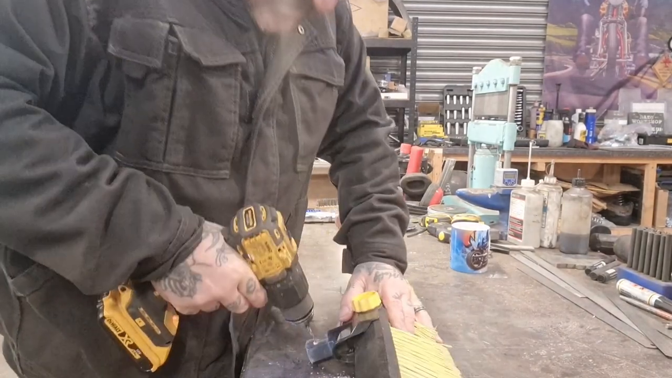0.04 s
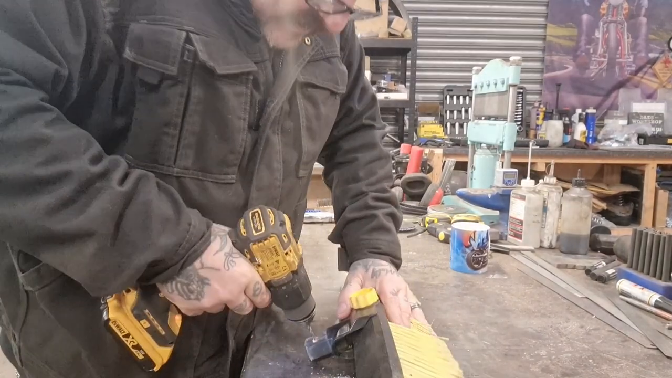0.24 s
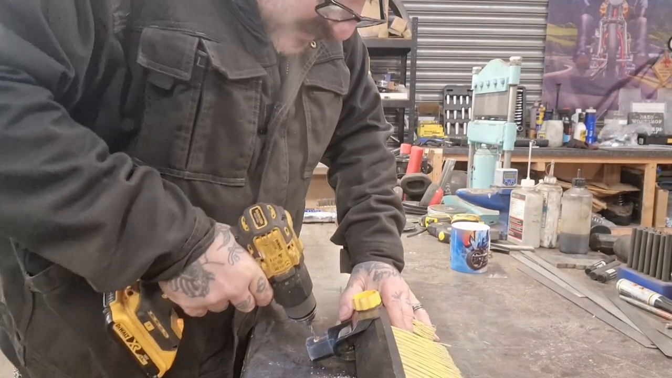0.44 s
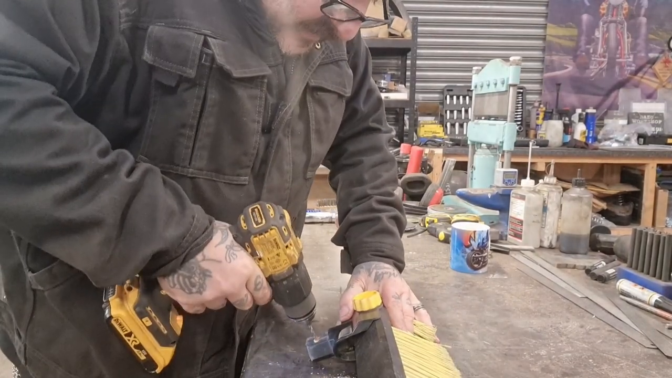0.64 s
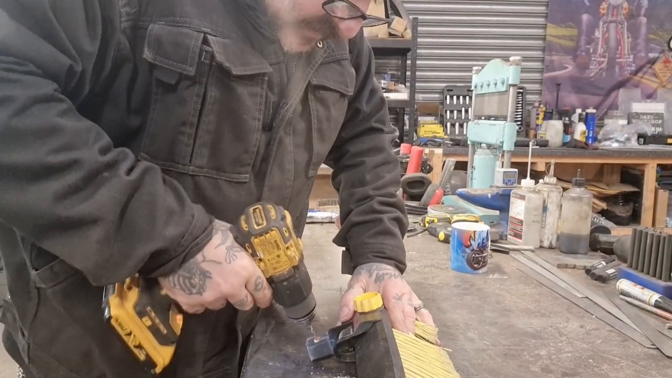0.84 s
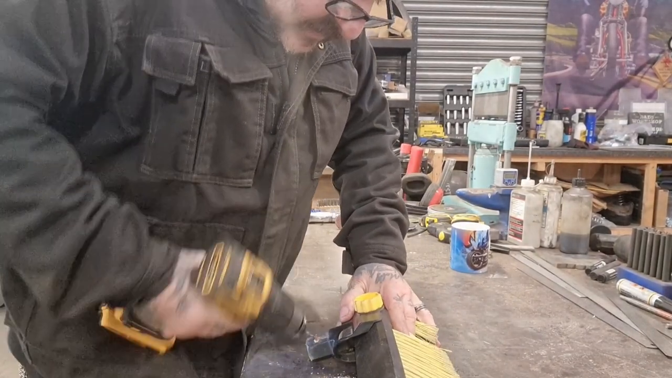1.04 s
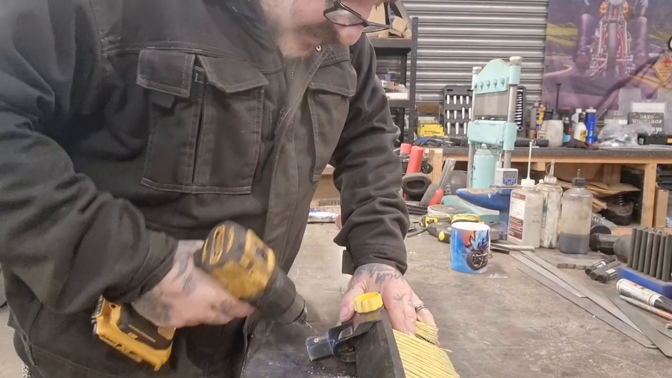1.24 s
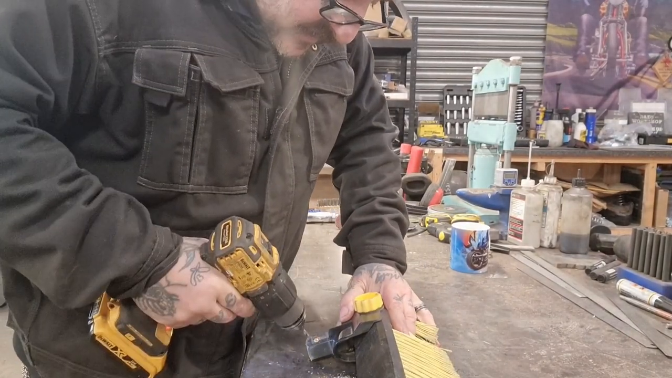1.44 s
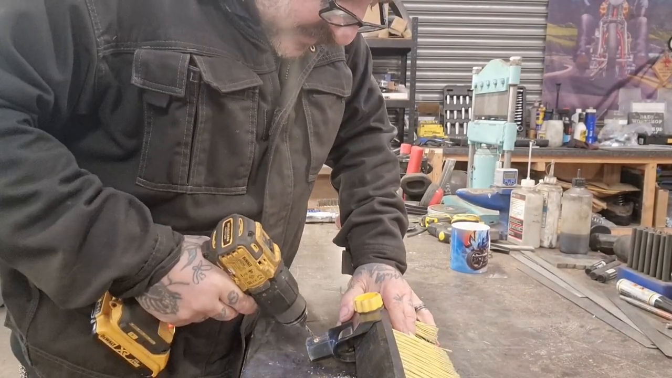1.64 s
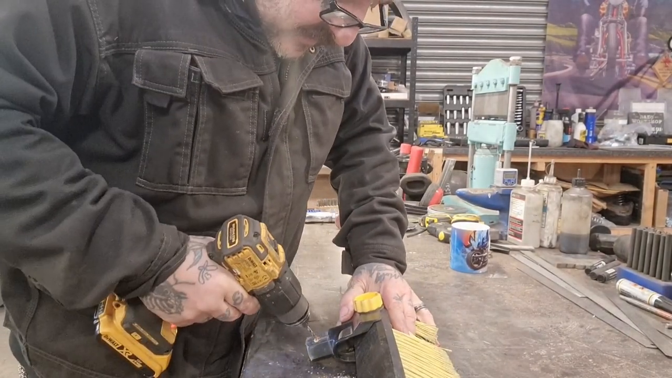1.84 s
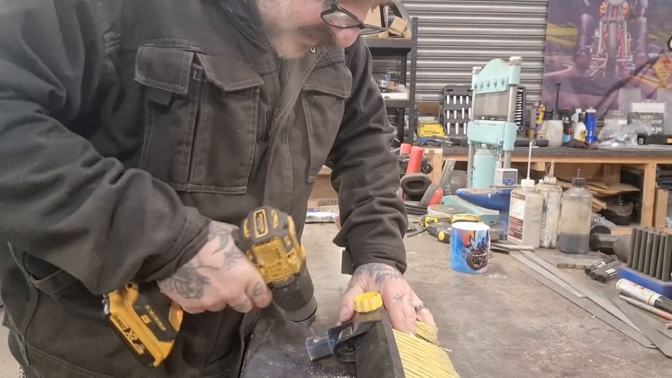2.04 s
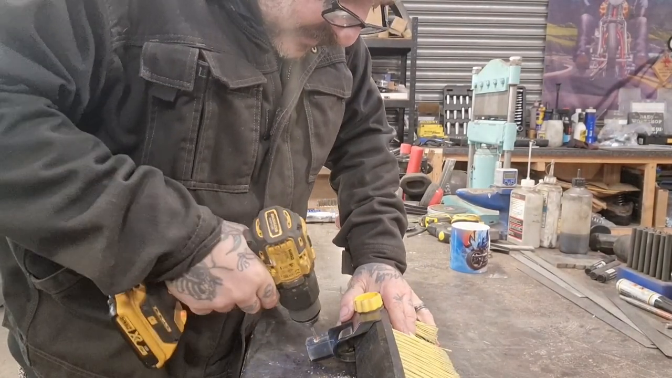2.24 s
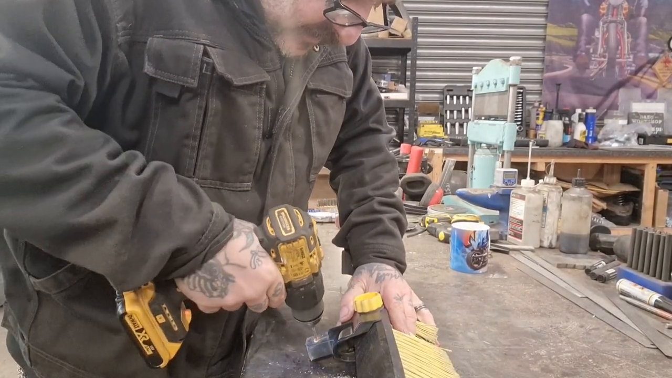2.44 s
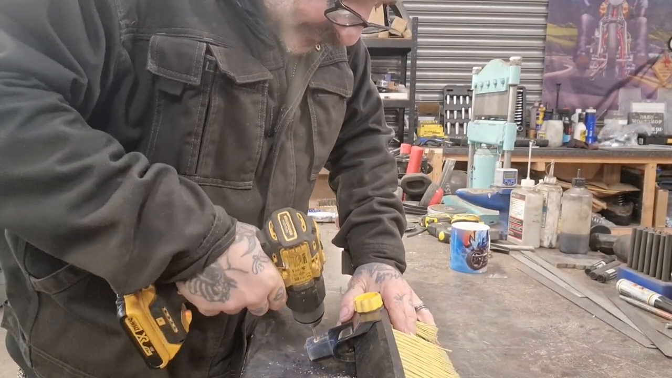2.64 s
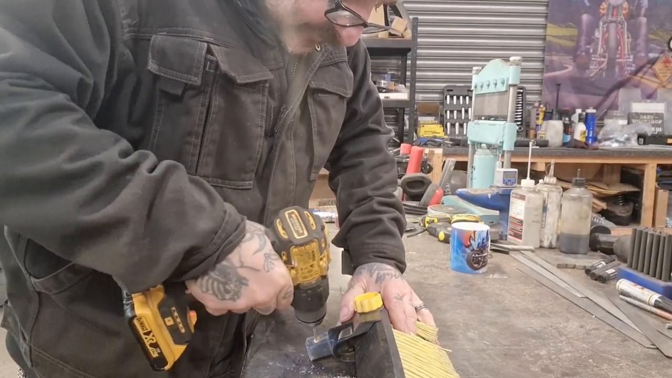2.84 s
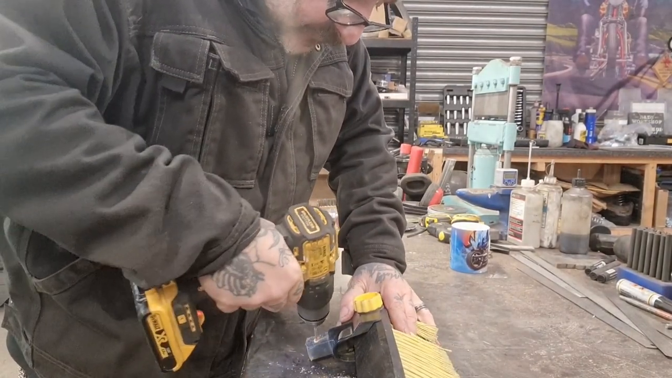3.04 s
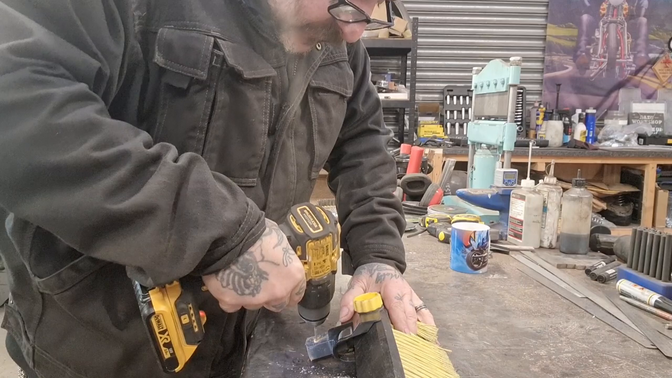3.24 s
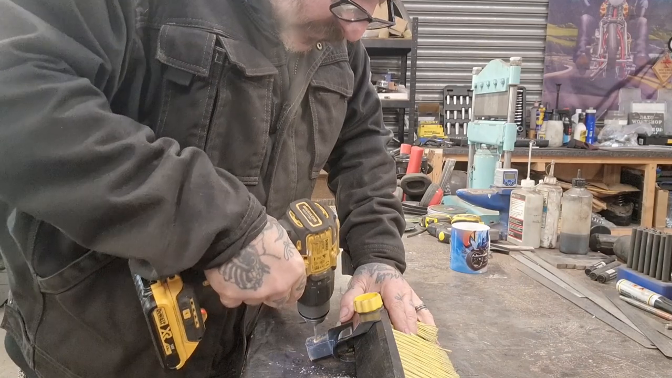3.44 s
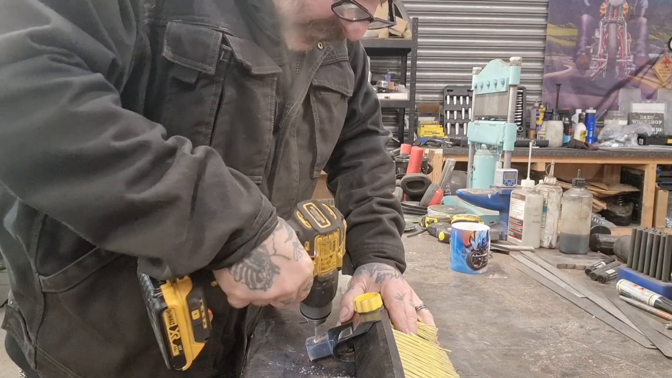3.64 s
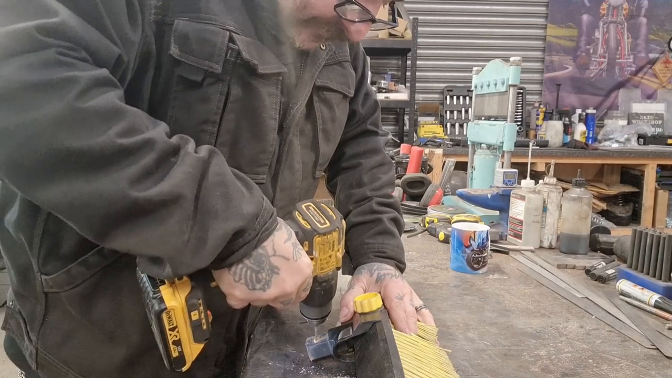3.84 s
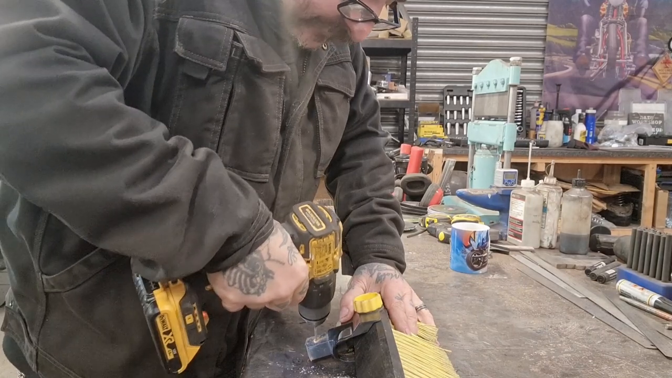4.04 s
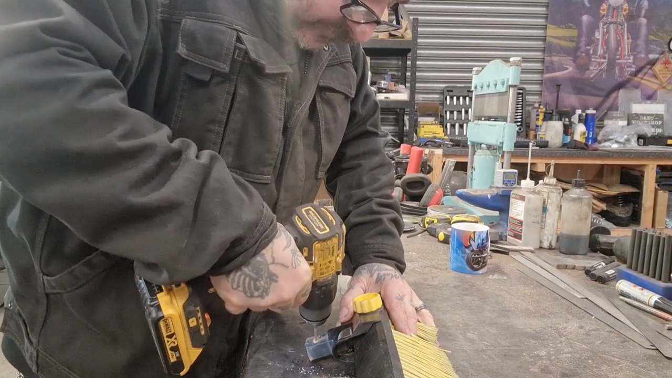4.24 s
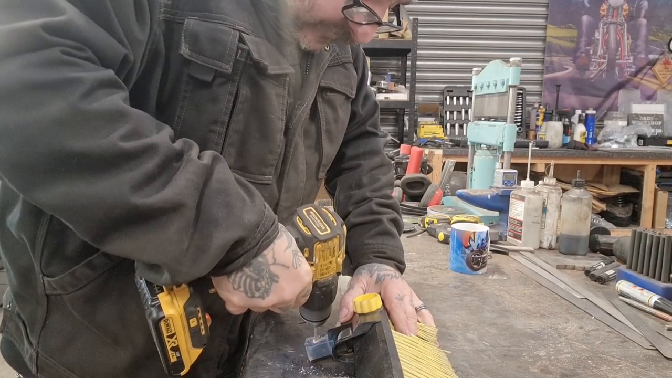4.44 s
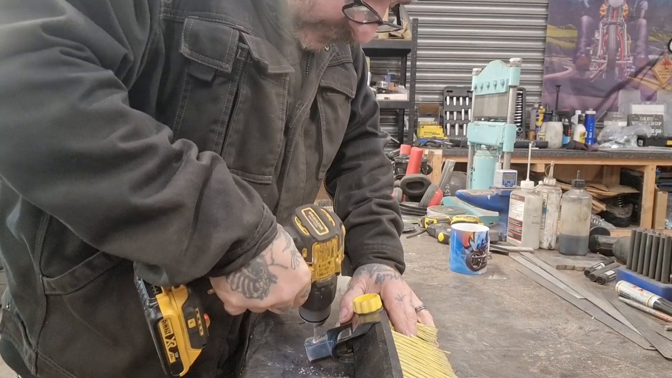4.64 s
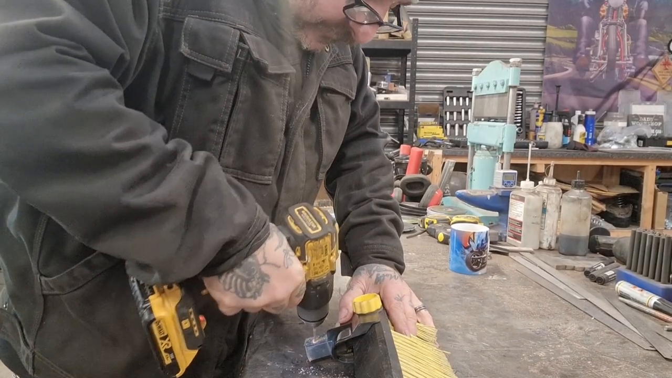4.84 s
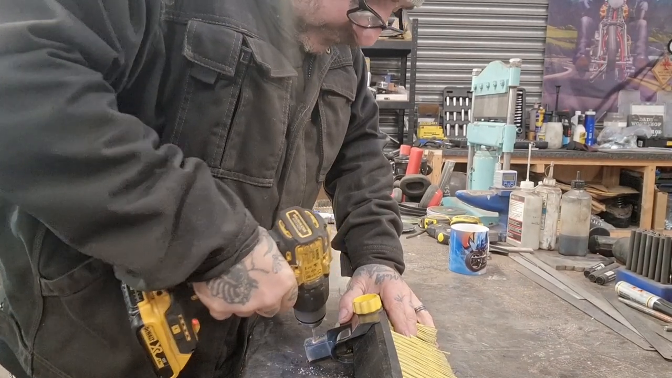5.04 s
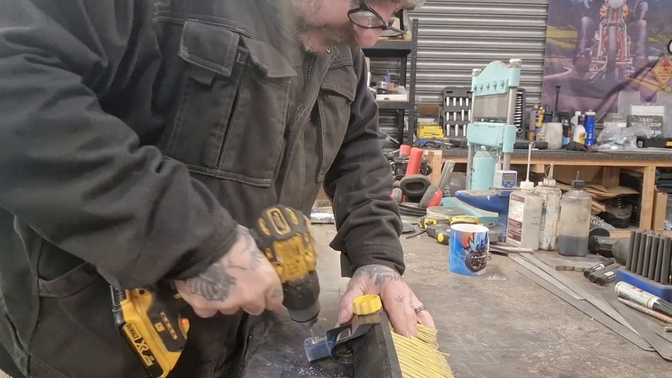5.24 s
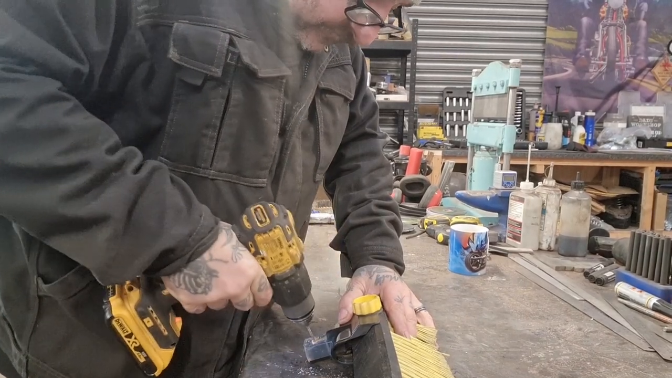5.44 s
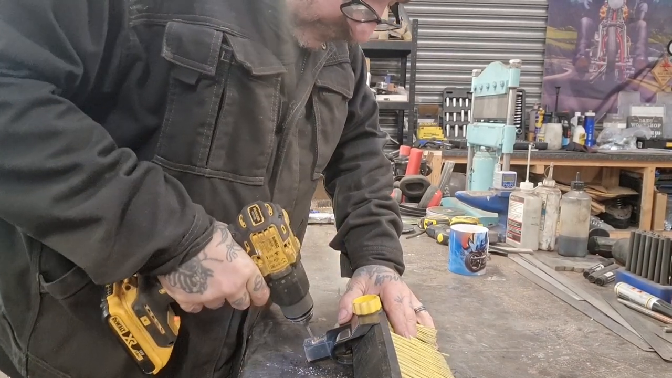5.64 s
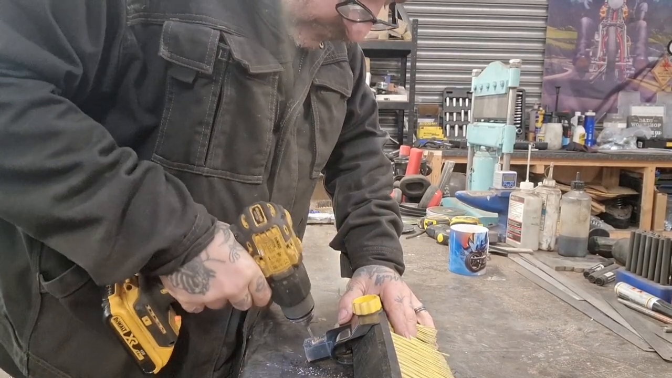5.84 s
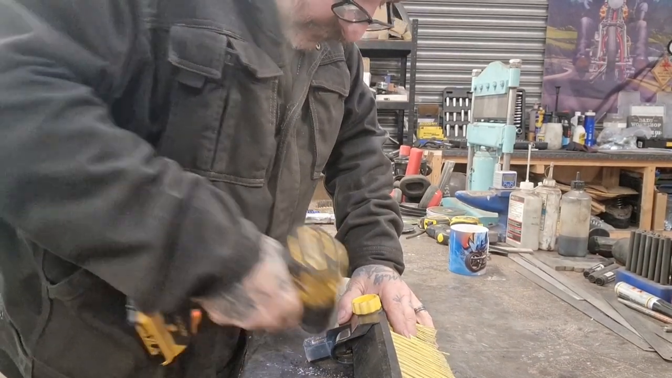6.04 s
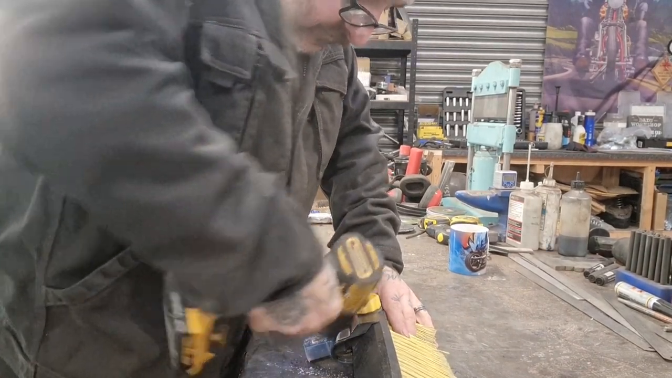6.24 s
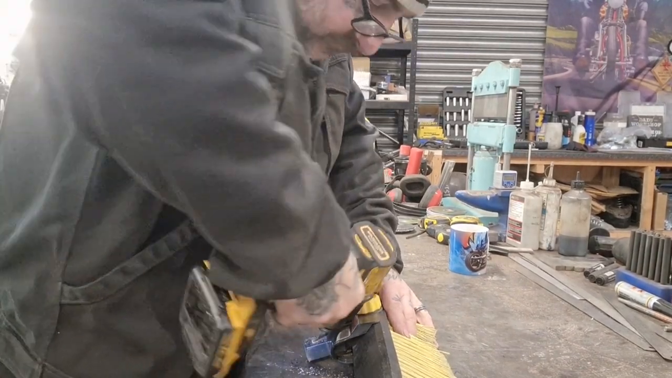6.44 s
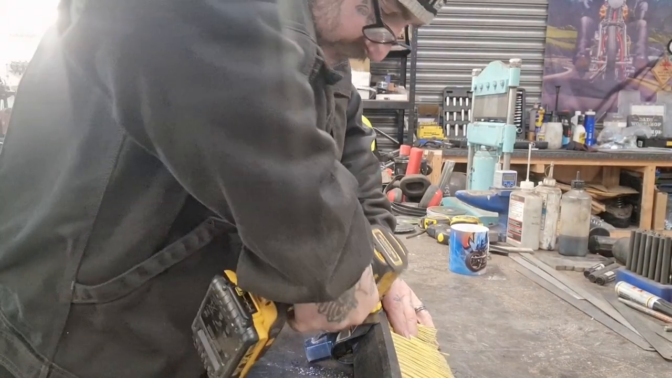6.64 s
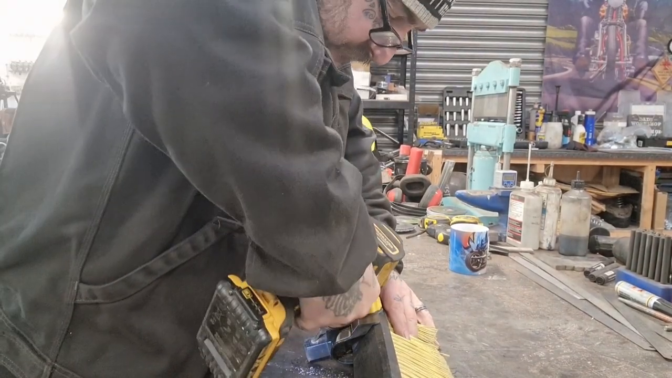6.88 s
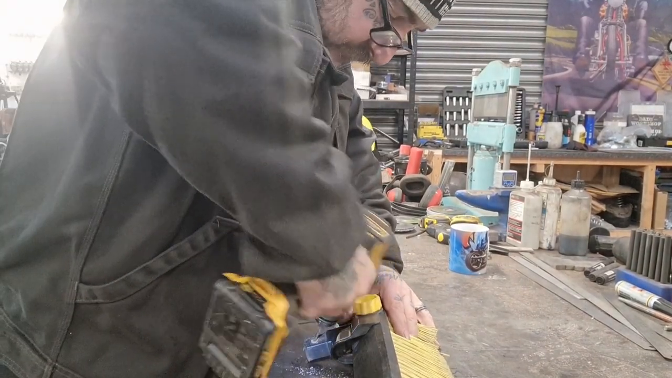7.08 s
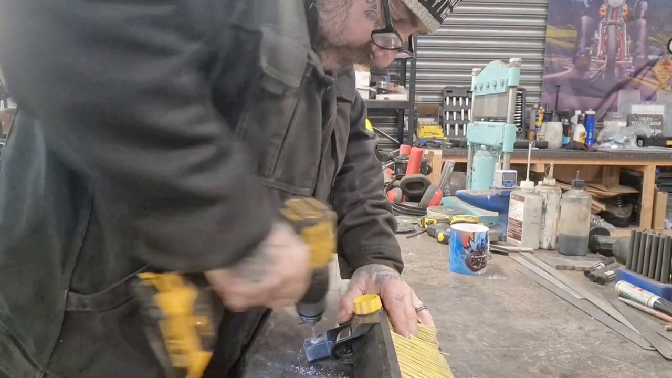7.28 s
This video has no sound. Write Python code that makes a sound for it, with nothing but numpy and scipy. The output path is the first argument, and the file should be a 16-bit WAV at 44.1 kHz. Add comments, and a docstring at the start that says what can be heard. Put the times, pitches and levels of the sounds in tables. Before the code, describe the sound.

A cordless drill clicks and whirs for half a second in a small workshop. After a pause and more clicks it runs for about four seconds, gears whining and rattling as the bit grinds and squeals into a metal rivet. Sharp clicks lead to a last short burst. Each run winds down in a falling chirp. The drill is close and slightly left, over a faint ventilation murmur.

```python
"""A small workshop, ventilation murmuring: a cordless drill bores into rivets in three trigger pulls.
Motor and gears whine with the shaft speed, teeth and flutes rattle, and in the long middle pull the
cutting edge grinds and squeals. The brake drags each run down in a falling chirp.
Trigger, chuck and bit click, and the wobbling bit shakes the bench.
The drill stands left of a pair of microphone ports, with the room answering around it."""
import sys
import numpy as np
from scipy import signal
from scipy.fft import rfft, irfft, next_fast_len
from scipy.io import wavfile
from scipy.ndimage import uniform_filter1d, map_coordinates

SR = 44100
rng = np.random.default_rng(int(sys.argv[2]) if len(sys.argv) > 2 else 0)


def wav_out(sig):
    """Save sig, one row per channel (or a flat mono array), as 16-bit PCM at SR to the path in sys.argv[1]."""
    wavfile.write(sys.argv[1], SR, np.round(np.clip(np.atleast_2d(sig).T, -1, 1) * 32767).astype(np.int16))


N = 322371

# colour of the ventilation bed: freq_hz, relative_db
AIR_COLOUR = [(25, -40), (45, -12), (75, -9), (100, -6.5), (170, -1.5), (250, -13.5), (390, -10),
              (530, -15.5), (680, -15), (1000, -20), (2000, -19), (5000, -31), (9000, -37.5), (10500, -45),
              (15000, -63)]
# how alike that bed is left and right: freq_hz, coherence
AIR_COHERENCE = [(130, 0.9), (300, 0.78), (650, 0.51), (1400, 0)]
# ventilation hum: pitch_hz, relative_db
VENT_HUM = [(102.3, -54), (156.1, -52), (301.5, -57.5)]
# faint air duct tones: pitch_hz, level_db
DUCT_TONES = [(390, -68.5), (684, -62), (1518, -62.5), (1943, -65)]
# reverb time of the workshop: freq_hz, t60_s
ROOM_DECAY = [(200, 0.45), (2000, 0.4), (6000, 0.27), (14000, 0.09)]
# colour of the wall reflections: freq_hz, gain_db
WALL_COLOUR = [(300, -4), (2000, -2.5), (5000, -3.5), (9000, 0.5), (14000, -2)]
# the drill's lean to the left port: freq_hz, left_over_right_db
LEFT_BIAS = [(300, -1.5), (700, 0.5), (1300, 2.5), (2400, 7), (4400, 6), (8000, 7.5), (14000, 17)]
# colour of the bench rumble: freq_hz, relative_db
BENCH_COLOUR = [(25, -38), (45, -27), (80, -4), (110, -5), (150, 2), (195, 5.5), (240, -15), (420, -17),
                (700, -44), (3000, -50), (10000, -75)]
# push of the off-centre bit on the bench: chuck_multiple, relative_db
BIT_RUNOUT = [(1, 0), (2, -4), (3, -10), (4, -4.5)]
# torque kicks into the bench: centre_s, level_db
TORQUE_JOLTS = [(1.02, -42), (2.08, -38), (6.53, -32.5)]
# trigger, chuck lock and bit touching the work: start_s, level_db, knock_offset_db, ring_offset_db
CONTACTS = [(0.29, -43, -6, -12), (0.354, -32, -12, -10), (1.376, -46, -10, -8), (1.874, -46.5, 12.5, -19),
            (1.976, -34, -9, -12), (1.994, -33, 1, -8.5), (6.171, -20, -12, -12), (6.185, -32, -13, -16),
            (6.417, -21, -8, -10), (6.431, -24, -2, -18)]
# ring of chuck and bit: pitch_hz, relative_db, t60_s
STEEL_MODES = [(2010, -17, 0.036), (2780, -5, 0.025), (3900, -5, 0.025), (4740, 5, .025), (8700, -4, .02)]
# the two main whines, coming and going with the grip: time_s, commutation_db, mesh_db
WHINE_LEVELS = [(0.55, -48, -39), (0.85, -42, -41), (2.2, -44, -44), (2.55, -46, -34), (2.63, -34.5, -35),
                (2.9, -33, -32.5), (3.25, -38, -43), (3.65, -54.5, -50), (4.15, -39, -34.5),
                (4.4, -47.5, -38.5), (5.22, -41, -35), (5.36, -32.5, -36), (5.93, -32, -35),
                (6.03, -41, -38), (6.55, -33, -42), (7.12, -34, -53)]
# lesser motor and gear tones: shaft_multiple, pull1_db, pull2_db, pull3_db
LESSER_TONES = [(2.997, -52, -48.5, -45.5), (7.76, -44, -50, -42), (9.5, -48, -47.5, -51),
                (9.74, -37.5, -49, -53), (9.9, -41, -47, -48), (11.93, -40, -43.5, -52),
                (13.52, -40.5, -55, -52), (19, -42.5, -51, -54), (19.7, -47.5, -63, -62),
                (28.7, -54, -59, -60)]
# squeal of the cutting edge against the rattle: time_s, relative_db
SQUEAL_LEVELS = [(2.2, -7.5), (2.6, -12), (3.05, -9), (3.5, -9), (4.4, -19), (4.85, -10), (5.4, -14.5),
                 (5.95, -10.5)]
# colour the housing gives the rattle: freq_hz, pull1_db, pull2_db, pull3_db
HOUSING_COLOUR = [(280, -16.5, -15, -12.5), (450, -21, -20.5, -17.5), (890, -10.5, -12.5, -15.5),
                  (1095, -20.5, -20.5, -14.5), (1483, -9, -6.5, -10), (1670, -11.5, -11, -13.5),
                  (2046, -1.5, 0.5, -3.7), (2520, -6.8, -6.5, -5.5), (3040, -13.5, -11.5, -11),
                  (3610, -5.5, -4.5, -9.5), (5480, -11, -9, -11.5), (8610, -8.5, -8.5, -11),
                  (9860, -21, -19.5, -23.5), (15500, -18.5, -16.5, -20.5)]
# gears taking up the drive or coming to rest: centre_s, level_db
GEAR_CLATTERS = [(1.052, -47), (2.038, -39), (6.19, -49), (6.462, -38.5)]
# shaft speed lost to the load in the long pull: time_s, sag_hz
LOAD_SAG = [(2.0, 0), (2.17, 7.2), (2.3, 4.6), (2.43, 5.8), (2.8, 0.4), (3.2, 0), (4.35, 0.7), (4.7, 1.6),
            (5.45, 6.1), (5.96, 1.2), (6.3, 0)]
# trigger pulls: start_s, release_s, gears_seat_s, standstill_s, full_speed_hz,
# slowdown_bend (1 = straight), rattle_db, drone_db, cogging_db, bit_wobble_db
TRIGGER_PULLS = [(0.359, 0.885, 0.967, 1.15, 464.2, 1.25, -25, -43.5, -27.5, -62),
                 (2.007, 5.93, 6.12, 6.205, 492, 2.6, -26.5, -59, -27, -76.5),
                 (6.421, 7.12, 7.268, 7.365, 486, 2.05, -30.5, -55.5, -28.5, -41)]

MESH_ORDER, GEAR_RATIO = 14.25, 10.3  # tooth strikes per shaft turn; shaft turns per chuck turn
LOAD_RATTLE_DB, LOAD_DRONE_DB, LOAD_WOBBLE_DB = 0.17, 1.98, 5  # boost per Hz of sag
TIME = np.arange(N) / SR


def amp(db):
    """Decibels to gain."""
    return 10 ** (np.asarray(db) / 20)


def unit(x):
    """Scale to rms 1."""
    return x / np.sqrt(np.mean(x ** 2) + 1e-20)


def along(points, hz):
    """Read (freq_hz, value) points on a log frequency axis."""
    freqs, values = np.transpose(points)
    return np.interp(np.log(hz + 1), np.log(freqs + 1), values)


def curves(rows):
    """An automation curve for each column after the time."""
    times, *columns = np.transpose(rows)
    return [np.interp(TIME, times, column) for column in columns]


def swells(rows, half_s):
    """A smooth rise and fall at each (centre_s, level_db)."""
    return sum(amp(db) * np.exp(-((TIME - centre_s) / half_s) ** 2) for centre_s, db in rows)


def wobble(rate):
    """A smooth random curve, rate knots a second."""
    return map_coordinates(rng.standard_normal(int(N * rate / SR) + 4), [TIME * rate])


def filtered(x, response):
    """Shape x by a complex frequency response."""
    size = next_fast_len(N + SR // 2)
    return irfft(rfft(x, size) * response(np.fft.rfftfreq(size, 1 / SR)), size)[..., :N]


def coloured(x, colour):
    """x through an EQ curve, at rms 1."""
    return unit(filtered(x, lambda hz: amp(along(colour, hz))))


def resonance(hz, centre_hz, width_hz):
    """Response of one mode, 1 at its centre."""
    return 1j * hz * width_hz / (centre_hz ** 2 - hz ** 2 + 1j * hz * width_hz)


def tone(turns, multiple, flutter_db=2.5, slip=0.26):
    """A partial near rms 1 on a multiple of a rotation; its level flutters and its phase slips."""
    phase = 2 * np.pi * (multiple * turns + rng.random()) + slip * wobble(70)
    return np.sqrt(2) * np.sin(phase) * unit(amp(flutter_db * wobble(22)))


def ventilation(air_db=-47.5, hum_trim_db=-2):
    """A bed of moving air, centred in the bass and wide above, with faint hum and breathy duct tones."""
    def spread(hz):
        angle = np.arccos(np.clip(along(AIR_COHERENCE, hz), -1, 1)) / 2
        return np.array([np.cos(angle), np.sin(angle)])
    mid, side = filtered(coloured(rng.standard_normal((2, N)), AIR_COLOUR), spread)
    hum = sum(amp(db + hum_trim_db) * tone(TIME, hz, slip=0.46) for hz, db in VENT_HUM)
    ducts = sum(amp(db) * np.array([tone(TIME, hz, slip=1.06) for port in range(2)])
                for hz, db in DUCT_TONES)
    return amp(air_db + wobble(5.5)) * np.array([mid + side, mid - side]) + hum + ducts


def workshop_reverb(x, early_db=3, early_t60_s=0.044, count=16):
    """Nearby clutter answers first, then the walls; tails crossfade as arm and drill move."""
    hz, t, noise = signal.stft(rng.standard_normal((count, 2, SR // 3)), SR, nperseg=256)
    decay = amp(-60 * t / along(ROOM_DECAY, hz)[:, None]) + amp(early_db - 60 * t / early_t60_s)
    tails = signal.istft(noise * decay, SR, nperseg=256)[1]
    hop = N // (count - 2)
    send = np.pad(filtered(x, lambda hz: amp(along(WALL_COLOUR, hz))), (hop, 2 * hop))
    wet = np.zeros((2, len(send) + SR))
    for k, tail in enumerate(tails):
        piece = send[k * hop:][:2 * hop] * signal.windows.cosine(2 * hop)
        answer = signal.fftconvolve(piece[None], tail / np.linalg.norm(tail[0]), axes=1)
        wet[:, k * hop:][:, :answer.shape[1]] += answer
    return wet[:, hop:hop + N]


def pan_left(x, lag_ms=0.045):
    """Direct sound reaches the left port earlier and, above the bass, stronger."""
    def response(hz):
        left = amp(along(LEFT_BIAS, hz) / 2) * np.exp(1j * np.pi * hz * lag_ms / 1000)
        pair = np.array([left, 1 / left])
        return pair / np.sqrt(np.mean(abs(pair) ** 2, axis=0))
    return filtered(x, response)


def bench_thrum(speed, turns, push_db, running_db=-44, resting_db=-54):
    """The off-centre bit pushes the bench once a turn; the top rumbles under hands, drill and jolts."""
    spin = speed / speed.max()
    push = sum(amp(db) * tone(turns / GEAR_RATIO, multiple, flutter_db=0, slip=0.05)
               for multiple, db in BIT_RUNOUT)
    rumble = coloured(rng.standard_normal(N), BENCH_COLOUR)
    shaking = np.hypot(amp(resting_db), amp(running_db) * spin) + swells(TORQUE_JOLTS, half_s=0.048)
    return amp(push_db) * spin ** 2 * push + shaking * rumble


def contact_clicks(crack_db=-7, knock_trim_db=-5, crack_t60_s=0.011, knock_t60_s=0.14):
    """Each contact layers a short crack, a steel ring and a dull knock."""
    metal, knocks = np.zeros((2, N + SR))
    t = np.arange(SR // 8) / SR
    for start_s, db, knock_db, ring_db in CONTACTS:
        ring = sum(amp(mode_db + rng.normal(0, 2) - 60 * t / t60) * np.sin(2 * np.pi * hz * t)
                   for hz, mode_db, t60 in STEEL_MODES)
        crack = amp(crack_db - 60 * t / crack_t60_s) * rng.standard_normal(len(t))
        knock = amp(knock_trim_db - 60 * t / knock_t60_s) * rng.standard_normal(len(t))
        onset = round(start_s * SR)
        metal[onset:][:len(t)] += amp(db) * (amp(ring_db) * ring + crack)
        knocks[onset:][:len(t)] += amp(db + knock_db) * knock
    clicks = metal[:N] + filtered(knocks[:N], lambda hz: 2 * resonance(hz, 460, 550))
    return filtered(clicks, lambda hz: 1 / (1 + 1j * hz / 9000))  # soften the top


def shaft_drive(sag_hz, spin_up_s=0.04, seat_drop_db=2.5, seat_fade_s=0.012):
    """Each pull spins up, sags under load and brakes; gives shaft speed in Hz and the rattle envelope."""
    speed = np.zeros(N)
    envelope = swells(GEAR_CLATTERS, half_s=0.027)
    for start_s, release_s, seat_s, standstill_s, full_hz, bend, rattle_db, *_ in TRIGGER_PULLS:
        rise = 1 - np.exp(-np.maximum(TIME - start_s, 0) / spin_up_s)
        fall = 1 - np.clip((TIME - release_s) / (standstill_s - release_s), 0, 1) ** bend
        speed += (full_hz - sag_hz) * rise * fall
        # the rattle ducks as the brake seats the gears
        seated = np.clip((TIME - seat_s) / seat_fade_s + 0.5, 0, 1)
        level = amp(rattle_db + LOAD_RATTLE_DB * sag_hz - seat_drop_db * seated)
        envelope += level * rise ** 0.99 * fall ** 2.2
    return speed * (1 + 0.0008 * wobble(18)), envelope


def braking(speed):
    """How hard the shaft is slowing, 0-1."""
    return np.clip(-uniform_filter1d(np.gradient(speed), SR // 30) * SR / 1200, 0, 1)


def brake_chirp(speed, turns, cog_db, mesh_db=-44, growl_db=-48):
    """Braking current makes the motor cog; rough falling tones sweep through the gearbox resonances."""
    def sweep(multiple, centre_hz, width_hz, slip=0.26):
        emphasis = abs(resonance(multiple * speed, centre_hz, width_hz)) ** 2
        return emphasis * tone(turns, multiple, slip=slip)
    judder = unit(1 + 0.57 * wobble(450))
    cog = amp(cog_db) * sweep(12, 3993, 890, slip=0.7)
    mesh = amp(mesh_db) * sweep(MESH_ORDER, 6800, 1500)
    growl = amp(growl_db) * sweep(3, 860, 440)
    return braking(speed) * judder * (cog + mesh + growl)


def motor_whine(speed, turns, pull, drone_db, flare_db=23, gear_play=0.068):
    """Motor and gear tones ride the shaft speed; the rotor's low drone lasts longest as it slows."""
    spin = np.clip(speed / 465, 0, 1)
    lesser = np.zeros(N)
    for multiple, *pull_db in LESSER_TONES:
        # each flares through the housing's resonance; gear play blurs the high ones most
        flare = 1 + amp(flare_db) * abs(resonance(multiple * speed, 7700, 480)) ** 2
        partial = tone(turns, multiple, flutter_db=4.5, slip=gear_play * multiple)
        lesser += amp(pull_db)[pull] * flare * partial
    commutation_db, mesh_db = curves(WHINE_LEVELS)
    commutation = amp(commutation_db + 0.5) * tone(turns, 6, flutter_db=1.8, slip=0.15)
    commutation *= amp(-4 * braking(speed))  # ducks once the trigger is let go
    mesh = amp(mesh_db) * (tone(turns, MESH_ORDER, slip=0.3) + 0.5 * tone(turns, 14.36, slip=0.3))
    drone = amp(drone_db) * tone(turns, 1.99, flutter_db=1.5, slip=0.2)
    return spin ** 3.7 * (lesser + commutation + mesh) + spin ** 2 * drone


def cutting_edge(bite, sag_hz, start_s=1.99, end_s=6.09, fade_s=0.09):
    """The edge rings the work and adds a narrow squeal whose pitch falls under load."""
    grind = unit(filtered(bite * rng.standard_normal(N), lambda hz: resonance(hz, 2166, 300)))
    grind_db = -7 - 2.5 * (TIME - start_s)  # fades as the hole deepens
    squeal_hz = 8220 - 104.5 * sag_hz
    narrow_noise = wobble(600) + 1j * wobble(600)
    squeal = unit(np.real(narrow_noise * np.exp(2j * np.pi * np.cumsum(squeal_hz) / SR)))
    squeal_db, = curves(SQUEAL_LEVELS)
    contact = np.clip(np.minimum(TIME - start_s, end_s - TIME) / fade_s, 0, 1)
    return contact * (amp(grind_db) * grind + amp(squeal_db) * squeal)


def housing(force, speed, pull):
    """The shell colours the rattle; while gathering speed, the loose gears mostly ring the gearbox."""
    colours = np.array(HOUSING_COLOUR)
    shell = np.choose(pull, [coloured(force, colours[:, [0, k + 1]]) for k in range(len(TRIGGER_PULLS))])
    ring = unit(filtered(force, lambda hz: resonance(hz, 3770, 380) + 0.25 * resonance(hz, 7850, 770)))
    rising = np.gradient(uniform_filter1d(speed, SR // 100)) > 0
    ring_mix = 0.57 * np.clip((380 - speed) / 100, 0, 1) * rising
    return np.sqrt(1 - ring_mix) * shell + np.sqrt(ring_mix) * ring


def drill_rattle(speed, sag_hz, turns, envelope, pull, scatter_db=6.25, flute_db=-0.5):
    """Gear teeth strike unevenly over the rush of fan and flutes, with the cutting edge on top."""
    teeth = np.diff(np.floor(MESH_ORDER * turns + 0.25 * wobble(2500)), prepend=0) > 0
    strikes = unit(teeth * np.tanh(rng.standard_normal(N)) * amp(scatter_db * np.tanh(wobble(900))))
    flutes = np.sin(4 * np.pi * turns / GEAR_RATIO)  # two pulses per chuck turn
    bite = amp(flute_db * flutes + 0.65 * wobble(160) + 0.59 * wobble(25))
    force = (strikes + rng.standard_normal(N)) * bite
    rattle = envelope * (housing(force, speed, pull) + cutting_edge(bite, sag_hz))
    # the small housing radiates almost no deep bass
    return filtered(rattle, lambda hz: hz ** 2 / (hz ** 2 + 70 ** 2))


def scene():
    """The stereo mix: drill up front and left, over reverb, bench and ventilation."""
    start_s, *_, drone_db, cog_db, push_db = np.transpose(TRIGGER_PULLS)
    pull = np.searchsorted(start_s[1:], TIME)  # which pull each sample belongs to
    sag_hz, = curves(LOAD_SAG)
    speed, envelope = shaft_drive(sag_hz)
    turns = np.cumsum(speed) / SR
    # the vents and gear case facing away rattle on their own, heard only by way of the room
    near, far = [drill_rattle(speed, sag_hz, turns, envelope, pull) for face in range(2)]
    clicks = contact_clicks()
    tones = motor_whine(speed, turns, pull, drone_db[pull] + LOAD_DRONE_DB * sag_hz)
    tones += brake_chirp(speed, turns, cog_db[pull])
    send = amp(-3.5) * far + amp(-3) * near + clicks + amp(-5) * tones
    room = workshop_reverb(send) * amp([[2], [-3]])
    bench = bench_thrum(speed, turns, push_db[pull] + LOAD_WOBBLE_DB * sag_hz) * amp([[0.5], [-0.5]])
    return pan_left(near + clicks + tones) + room + bench + ventilation()


def record(dry):
    """A brick-wall high cut at 15.8 kHz."""
    return filtered(dry, lambda hz: hz < 15800)


dry = scene()
out = record(dry)
wav_out(out)
```